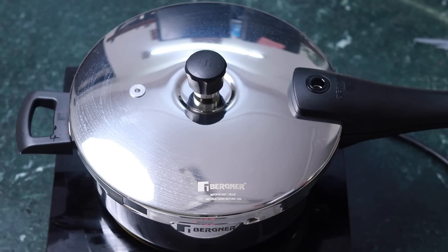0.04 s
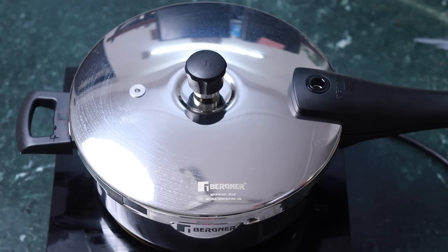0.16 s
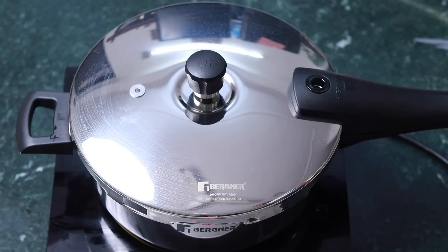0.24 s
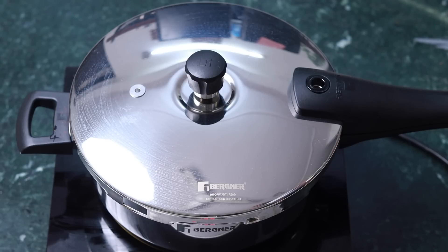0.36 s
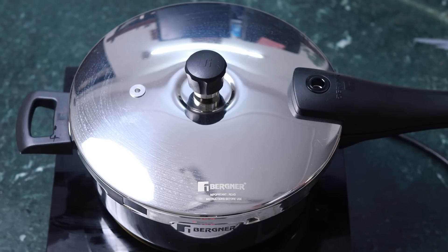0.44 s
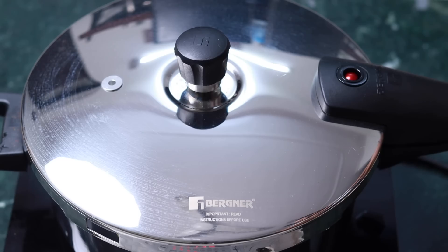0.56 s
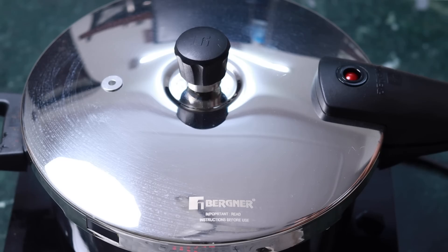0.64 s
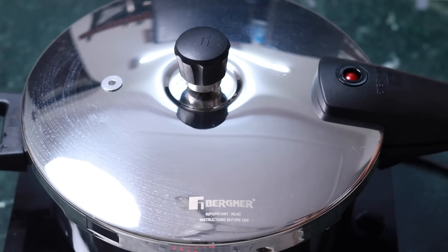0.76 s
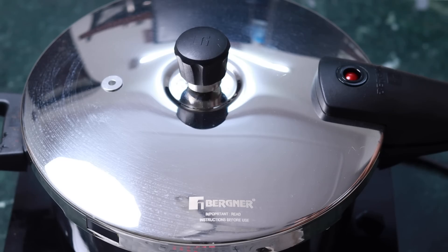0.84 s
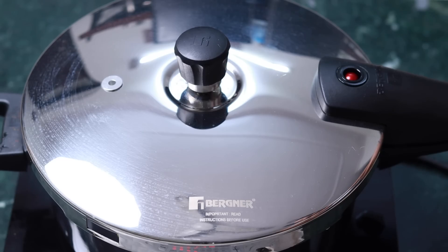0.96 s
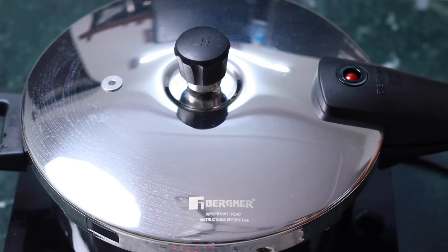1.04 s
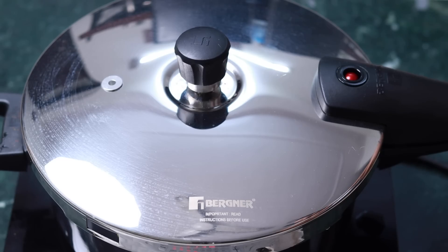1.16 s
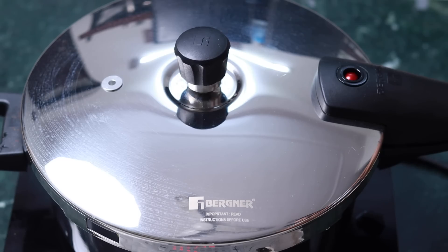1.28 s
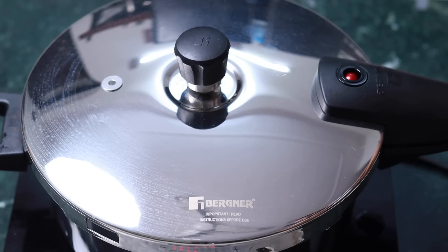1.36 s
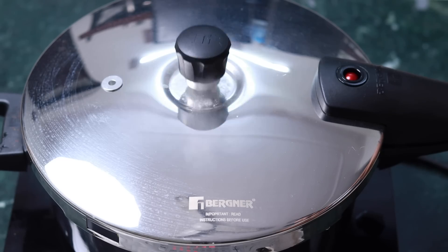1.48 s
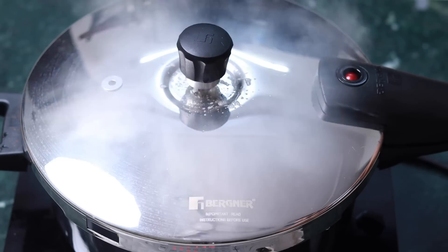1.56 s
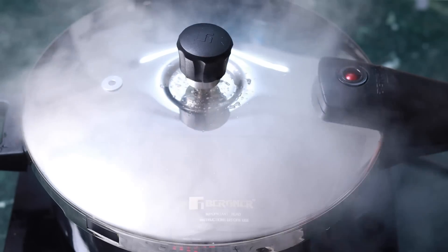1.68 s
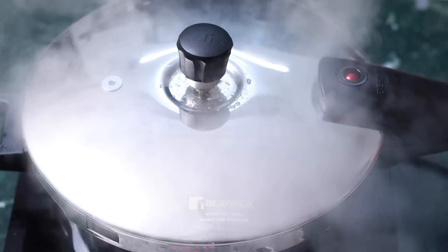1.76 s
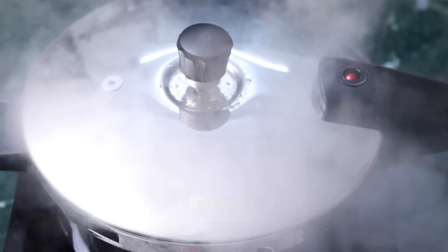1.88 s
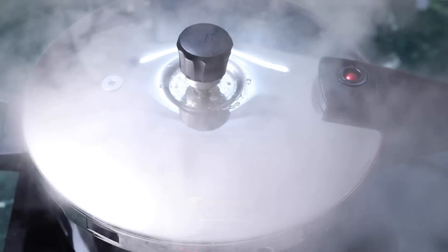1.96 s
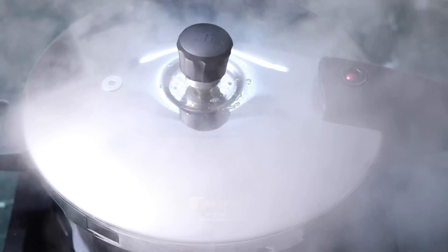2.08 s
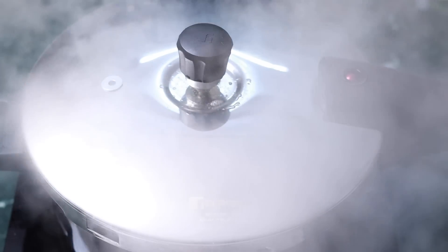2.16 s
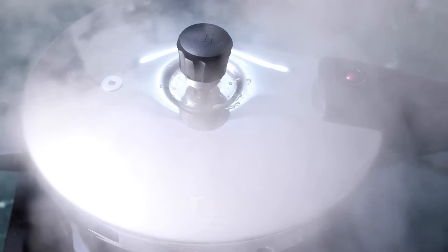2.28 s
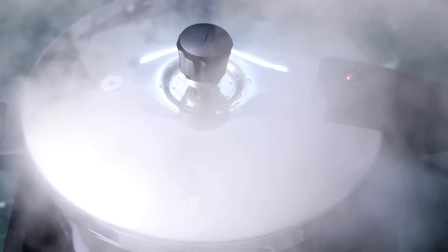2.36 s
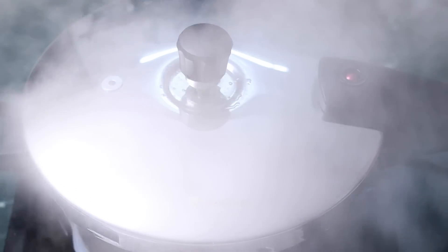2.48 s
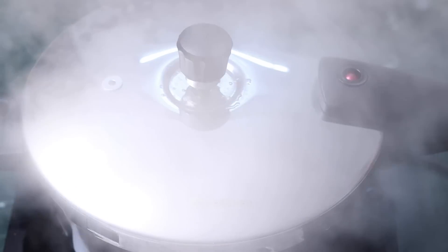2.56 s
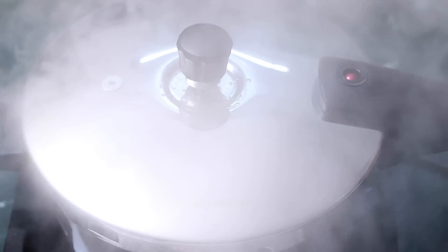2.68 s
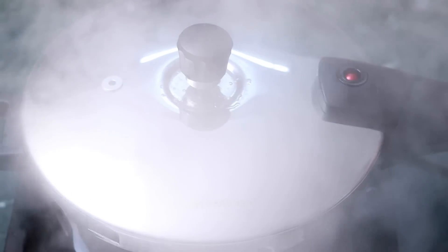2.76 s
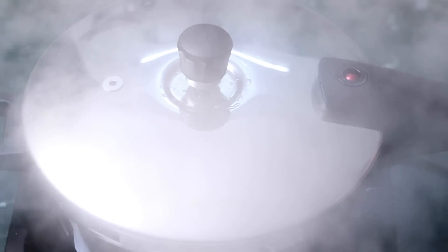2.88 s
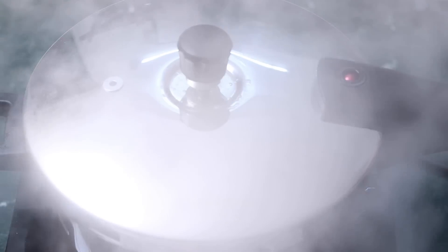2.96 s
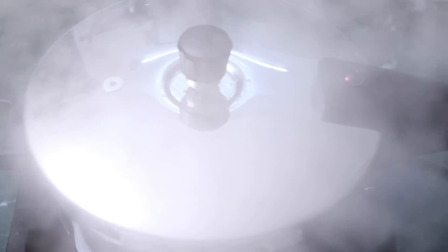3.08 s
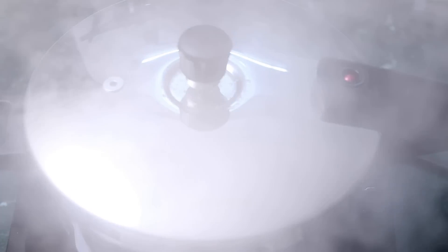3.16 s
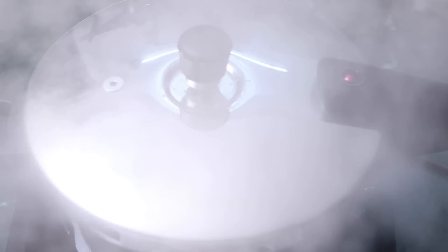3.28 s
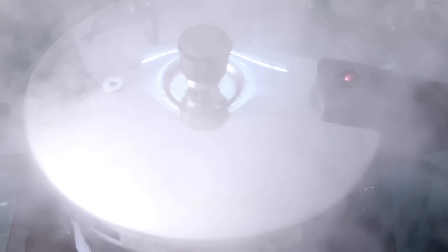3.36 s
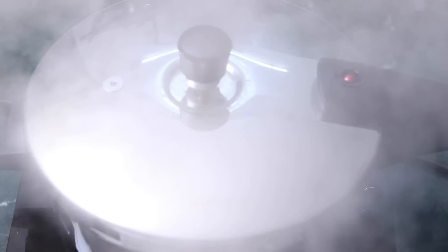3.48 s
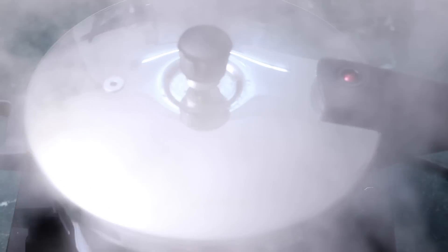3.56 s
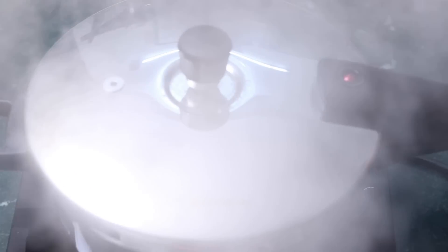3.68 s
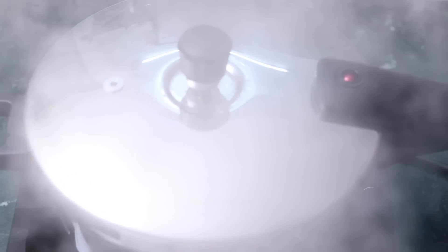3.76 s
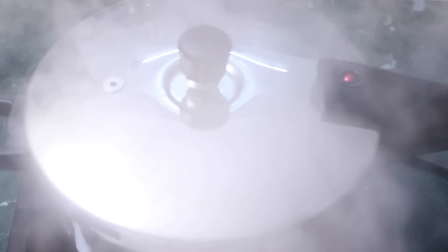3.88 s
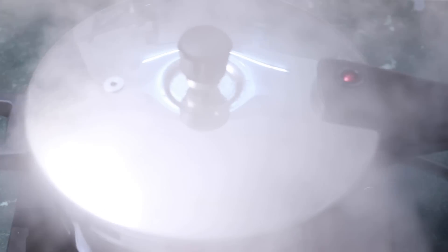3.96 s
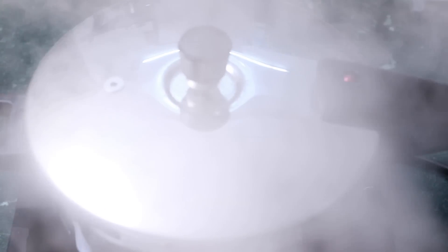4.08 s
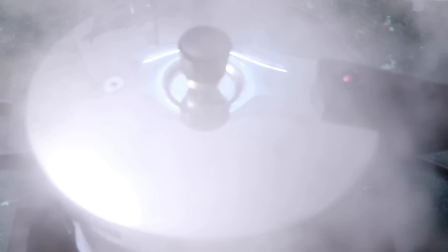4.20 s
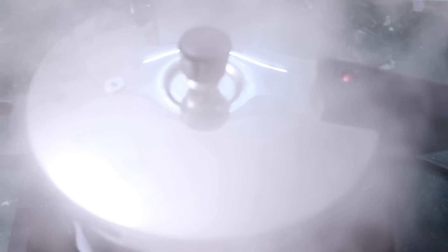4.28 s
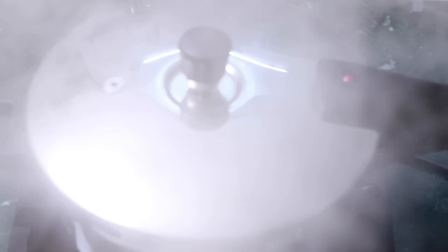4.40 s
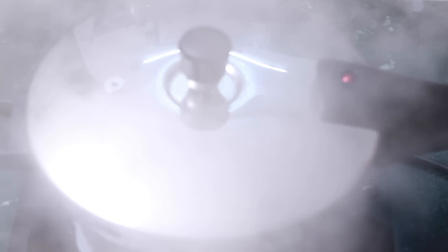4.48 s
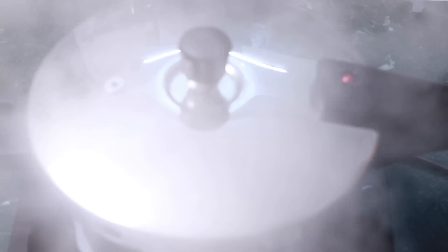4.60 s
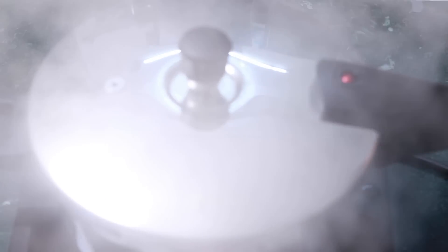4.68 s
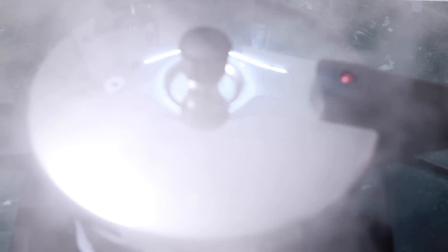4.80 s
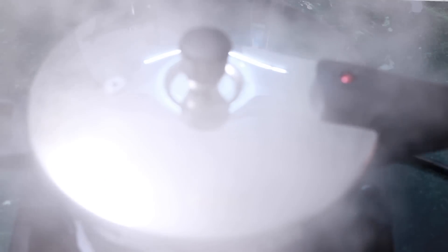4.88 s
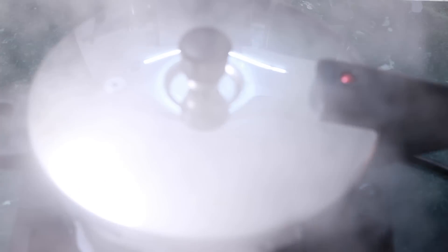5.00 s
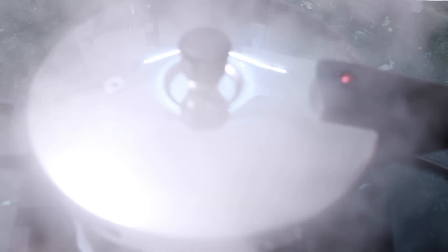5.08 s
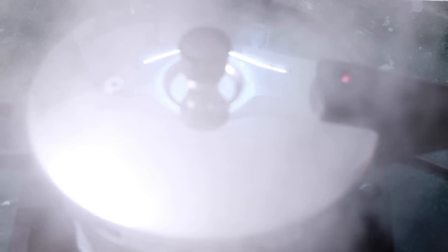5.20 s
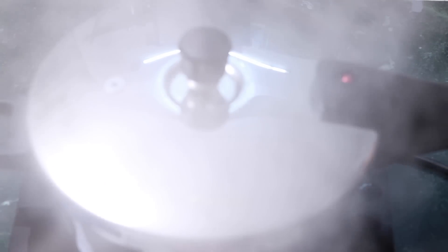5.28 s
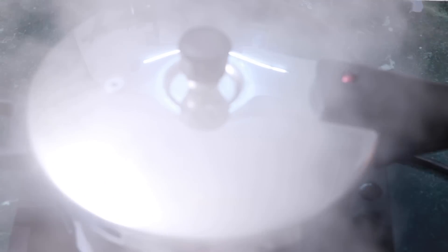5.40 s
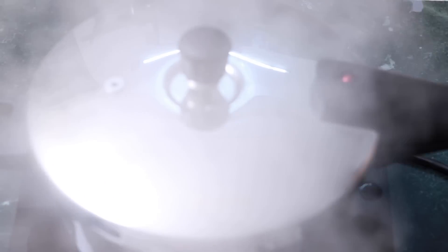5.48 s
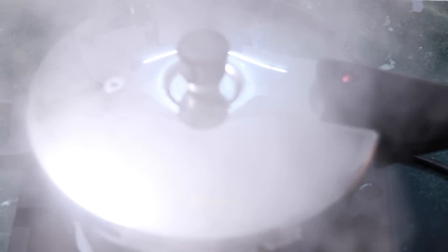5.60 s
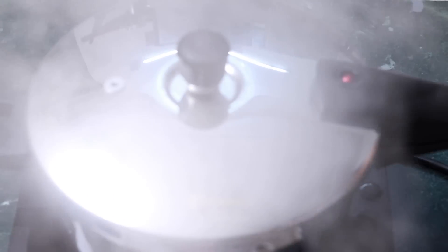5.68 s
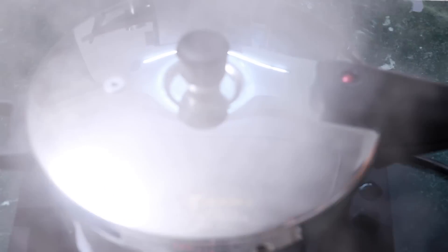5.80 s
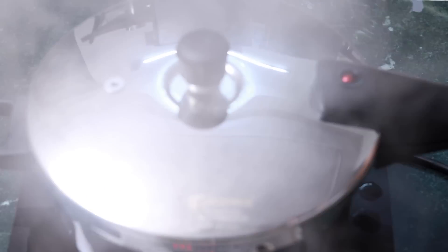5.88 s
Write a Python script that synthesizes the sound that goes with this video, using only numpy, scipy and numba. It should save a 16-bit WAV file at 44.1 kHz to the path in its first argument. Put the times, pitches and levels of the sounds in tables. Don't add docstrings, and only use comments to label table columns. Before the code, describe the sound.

Soft fan rush and simmering pot, crackly steam spits, a metallic knock, then a long bright steam jet that cuts off with a rattle.

```python
import sys
import numpy as np
from scipy import signal
from scipy.fft import rfft, irfft, next_fast_len
from scipy.io import wavfile
from scipy.ndimage import uniform_filter1d
from numba import njit

SR = 44100
rng = np.random.default_rng(int(sys.argv[2]) if len(sys.argv) > 2 else 0)


def volts_from_db(level):
    exponent = np.asarray(level, float) / 20
    return 10 ** exponent


def master(y):
    cut = np.clip(np.atleast_2d(y).T, -1, 1)
    pcm = np.round(cut * 32767)
    wavfile.write(sys.argv[1], SR, pcm.astype(np.int16))


N = 261938

# (frequency [Hz], level [dB per Hz])
FAN_COLOUR = [(70, -48), (120, -11.5), (420, -2), (700, -7), (1200, -9.5), (2080, -15), (4200, -24),
              (7850, -37), (11000, -49), (15600, -76)]
# (frequency [Hz], level [dB per Hz])
RUMBLE_COLOUR = [(25, -24), (45, -15), (70, -6), (100, -2), (130, -6.5), (200, -32.5)]
# (frequency [Hz], width [Hz], level [dB])
POT_MODES = [(426.5, 22, 0.5), (480, 69, -3.5), (551, 47, -7), (1035, 25, -22), (1208, 57, -11.5)]
# (full level [dB], change in the quiet opening [dB], change under the jet [dB], wander [dB])
FAN_LEVELS = (-52, -4.5, -4.5, 0)
HUM_LEVELS = (-42.5, -32, -6, 2.03)
RUMBLE_LEVELS = (-60, -10, -6, 0.5)
OPENING_RISE = .05, 0.53
# (time [s], half length [s], hum [dB], rumble and fan [dB])
JOLTS = [
    (1.59, .07, 8.5, -1),
    (3.87, 0.4, 2, 9.5),
    (5.664, 0.055, 9, 0),
]

# (time [s], peak [dB], upper bands relative [dB], rise [s])
PUFFS = [(0.38, -49, -12, 0.018), (0.476, -37.5, -11, .0021), (0.4994, -67, -13, .003),
         (0.6194, -55, 1.5, .003), (0.7144, -42.5, -7, 0.012), (0.871, -37, -6.5, .003),
         (0.9294, -43.5, 2.5, .003), (0.9537, -46, 0, 0.014), (1.103, -34.5, -8, 0.0065),
         (1.1244, -31, -3.5, 0.019), (1.14, -45, -6, .003), (1.1644, -39, -3, .003),
         (1.2776, -33, -8, .0025), (1.2944, -52, -12, .003)]
# (frequency [Hz], level [dB per Hz])
SPIT_LOW = [(2000, -16.5), (2650, -13), (2850, -1.5), (3500, -1.5), (3750, -13), (4600, -16), (5300, -29.5)]
SPIT_HIGH = [(4500, -24), (5400, -6), (6200, 2), (6600, 5), (7200, -7), (8100, 3), (8800, -8), (9600, -27)]
SPIT_TOP = [(8800, -6), (9800, -2), (11000, -5), (12500, -2), (13600, -7), (15600, -16)]

# (time [s], jet level [dB])
FLOW = [(0, -82), (.46, -65), (.475, -69), (1.245, -50), (1.36, -57.5), (1.474, -38), (1.514, -24.5),
        (1.586, -13.5), (1.64, -15.5), (2.09, -18.5), (3.06, -19.5), (3.2, -18.5), (3.87, -20), (5.59, -20),
        (5.634, -22.5), (5.659, -32), (5.864, -65), (5.94, -73)]
# (start [s], length [s])
MOVES = [
    (1.36, 0.22),
    (3.197, 0.34),
    (3.645, 0.053),
    (4.624, .08),
    (5.62, .05),
]
# (frequency [Hz], level [dB per Hz])
LEAKING = [(1180, -52), (2000, -44), (2320, -15), (2580, -32), (3010, 6), (3140, 5), (4050, -29),
           (4910, -9), (5360, -10), (6660, 2), (7350, -14), (8120, -9), (8800, -14), (11400, -60),
           (19400, -120)]
LIFTED = [(350, -38), (600, -18), (649, -23), (1020, -15), (1350, -14), (1950, -12), (2140, -15.5),
          (2830, -1.5), (3390, 3.5), (4050, -4.5), (4430, -1.5), (5870, -4), (7030, 1.5), (8800, -12.5),
          (11400, -40), (19400, -120)]
TURNING = [(350, -49), (600, -29), (743, -22), (940, -23.5), (1140, -21), (1250, -19), (1490, -28),
           (2160, -10), (2500, -15.5), (3660, -3), (4530, -8), (5020, -7.5), (7350, -5), (8800, -29),
           (11400, -51), (19400, -120)]
TILTED = [(350, -57), (600, -20.5), (984, -14), (1360, -21), (1780, -9), (2280, -7.5), (2560, -0.5),
          (2990, 1), (3700, 1.5), (5020, -4.5), (5430, 0.5), (6140, -3.5), (7520, 1.5), (8800, -15.5),
          (11400, -43), (19400, -120)]
SETTLING = [(350, -53), (600, -25), (656, -31), (710, -20), (760, -23.5), (984, -18.5), (1440, -25.5),
            (1830, -14), (2340, -14.5), (2610, -9), (3500, -1.5), (4100, -6), (7270, -6), (8800, -17.5),
            (11400, -43), (19400, -120)]
CLOSED = [(1000, -41), (1700, 1), (2150, 3), (2430, -3), (2680, 2), (3360, 0), (5710, -5), (6370, 6.5),
          (8800, -8), (11400, -43), (19400, -120)]
# (frequency [Hz], level [dB per Hz])
TOP_FAINT = [(5180, -28), (8800, -1), (9780, -4), (10700, -7), (11600, -7), (13800, -12), (15600, -17)]
TOP_EARLY = [(5180, -29), (8800, -3.5), (10200, -7.5), (11600, -8.5), (12500, 0.5), (13300, -1.5),
             (15200, -6.5), (15600, -7)]
TOP_LATE = [(5180, -40), (8800, -6.5), (9600, -5), (10500, -3.5), (11800, 0.5), (13900, 3), (15600, -2)]
# (top octave [dB], top colour [0 faint, 1 early, 2 late, 3 faint],
# lower edge tone [dB], upper edge tone [dB], upper pitch over lower [ratio])
SEATS = [
    (-8, 2.5, -35, -30, 1.8),
    (-9.5, 1.5, -26, -3, 2.06),
    (-9, 1.1, -7, -5, 1.92),
    (-8.5, 2, -3.5, -8, 2.03),
    (-8.5, 2, -6.5, -27, 2.03),
    (-2.5, 3.5, -24, -25, 2.03),
]
# (centre [Hz], depth [0-1])
SHADES = [
    (4050, .3),
    (3950, 0.23),
    (4500, 0.6),
    (5170, 0.36),
    (5250, 0.07),
    (5260, 0.4),
]
# (time [s], lower tone [Hz], strength over jet [dB])
EDGE_TONES = [(1.5, 3200, -9), (2.95, 3420, -7.5), (3.2, 3460, 0), (3.36, 3340, 0.5), (3.6, 3900, -3.5),
              (3.68, 3970, -9), (3.85, 3600, -8), (4.3, 3680, -7.5), (4.62, 3840, -10), (4.8, 3500, -4),
              (5.45, 3850, -13), (5.57, 4150, 0.5), (5.645, 3300, -1.5)]

# (time [s], peak [dB])
DROPS = [(.477, -44), (.499, -48), (.618, -48), (.873, -39), (.93, -44), (1.131, -37), (1.141, -31.5),
         (1.161, -32), (1.168, -34), (1.28, -35), (1.294, -34)]

# (time [s], peak [dB], core mode [Hz], ring stretch [ratio])
KNOCKS = [(1.527, -29, 480, 1.8), (1.569, -11, 730, 0.62), (1.589, -21.5, 800, 0.88), (5.6, -29, 748, 0.86),
          (5.633, -25.5, 730, 0.8), (5.654, -22, 816, 1.65), (5.695, -26, 812, 1.3), (5.72, -26, 780, 0.55),
          (5.741, -29.5, 806, 1.1), (5.765, -43, 776, 0.77), (5.8, -43, 793, 1.2)]
# (frequency [Hz], level [dB], time to fall 60 dB [s])
LID_MODES = [(324, -3.5, 0.029), (462, -10, 0.062), (626, -7.5, 0.037), (863, -7.5, 0.1),
             (1000, -5.5, 0.036), (1206, -6, 0.066), (1390, -7, 0.046), (1496, 1.5, 0.02)]

# (delay [ms], level [dB])
ECHOES = [(1.099, -40), (1.9, -42), (3.101, -27.5), (4.701, -20)]
# (time [s], centre [Hz])
SPLITS = [(1.878, 5650), (2.085, 15000), (2.179, 8600), (2.18, 12700), (2.552, 15000), (2.621, 8500),
          (2.645, 11000), (2.634, 13700), (3.131, 13700), (3.758, 8200), (3.759, 11000), (4.131, 7250),
          (4.427, 4700), (4.432, 6900), (4.863, 4850), (4.852, 13000), (4.941, 8250), (4.942, 10300),
          (5.197, 8900)]


def at(s, value):
    return np.interp(np.arange(N) / SR, s, value)


def ramp(start, length):
    return np.clip((np.arange(N) / SR - start) / max(length, .001), 0, 1)


def unit(x):
    return x / np.sqrt(np.mean(x ** 2))


def walk(rate):
    hold = int(SR / rate)
    steps = np.repeat(rng.standard_normal(N // hold + 1), hold)
    return unit(uniform_filter1d(uniform_filter1d(steps, hold), hold)[:N])


def colour(x, points):
    hz, db = np.transpose(points)
    size = next_fast_len(N, True)
    bins = np.arange(1, size // 2 + 2) * SR / size
    gain = volts_from_db(np.interp(np.log(bins), np.log(hz), db))
    return irfft(rfft(x, size) * gain, size)[:N]


def blend(noise, place, colours):
    return sum(np.clip(1 - abs(place - k), 0, 1) * unit(colour(noise, c)) for k, c in enumerate(colours))


@njit
def svf(x, hz, width):
    y, band, low = np.empty(len(x)), 0., 0.
    for i in range(len(x)):
        g, k = np.tan(np.pi * hz[i] / SR), width / hz[i]
        v = (band + g * (x[i] - low)) / (1 + g * (g + k))
        band, low, y[i] = 2 * v - band, low + 2 * g * v, k * v
    return y


def hob():
    quiet = 1 - ramp(OPENING_RISE[0], OPENING_RISE[1] - OPENING_RISE[0])
    duck = ramp(1.66, 0.11)
    fan_db, hum_db, rumble_db = (db + quiet_db * quiet + duck_db * duck + wander_db * walk(6.7)
                                 for db, quiet_db, duck_db, wander_db in (FAN_LEVELS, HUM_LEVELS, RUMBLE_LEVELS))
    for s, half, ring_db, thud_db in JOLTS:
        jolt = ramp(s - half, half) - ramp(s, half)
        fan_db = fan_db + 0.34 * thud_db * jolt
        hum_db = hum_db + ring_db * jolt
        rumble_db = rumble_db + thud_db * jolt
    blade_hz = 736 * (1 + 0.00155 * walk(5.12))
    blade = np.sin(2 * np.pi * np.cumsum(blade_hz) / SR) * volts_from_db(1 + 2 * walk(14))
    rush = volts_from_db(7.0) * unit(colour(rng.standard_normal(N), FAN_COLOUR))
    fan = (rush + blade) * volts_from_db(fan_db)
    rumble = unit(colour(rng.standard_normal(N), RUMBLE_COLOUR)) * volts_from_db(rumble_db)
    hum = 0
    for hz, width, db in POT_MODES:
        level = volts_from_db(db + 0.43 * walk(11))
        centre = hz * (1 + 0.0088 * walk(3.22))
        hum = hum + level * unit(svf(rng.standard_normal(N), centre, float(width)))
    hum = signal.lfilter(*signal.butter(2, 6000, fs=SR), hum)
    return fan + rumble + hum * volts_from_db(hum_db - 3)


def puffs():
    spray = rng.standard_normal(N) * volts_from_db(1.9 * walk(350))
    lower = unit(colour(rng.standard_normal(N) * volts_from_db(0.81 * walk(380)), SPIT_LOW))
    upper = unit(colour(spray, SPIT_HIGH)) + volts_from_db(-15) * unit(colour(spray, SPIT_TOP))
    out, clock = 0, np.arange(N) / SR
    for s, db, upper_db, rise in PUFFS:
        t = np.clip(clock - s, 0, 1)
        t60 = 0.09 + 2.2 * rise
        shape = ramp(s, rise) * volts_from_db(-60 * (t / t60) ** 2)
        out = out + volts_from_db(db - 9.0) * shape * (1.11 * lower + volts_from_db(upper_db) * upper)
    return out


def jet():
    seat = sum(ramp(*move) for move in MOVES)

    def by_seat(table):
        return [np.interp(seat, np.arange(len(table)), column) for column in np.transpose(table)]

    top_db, top_place, low_db, high_db, high_ratio = by_seat(SEATS)
    flutter = volts_from_db(0.48 * walk(300) + .5 * walk(40) + 0.065 * walk(8.9))
    seat_colours = (LEAKING, LIFTED, TURNING, TILTED, SETTLING, CLOSED)
    gap = blend(rng.standard_normal(N) * flutter, seat, seat_colours)
    top_colours = (TOP_FAINT, TOP_EARLY, TOP_LATE, TOP_FAINT)
    top = blend(rng.standard_normal(N) * flutter, top_place, top_colours)
    opening_db = -22 * (1 - ramp(.47, .004))
    sputter_db = 3.5 * np.clip(1 - seat, 0, 1) * (walk(80) - 3.5)
    steam = gap + top * volts_from_db(top_db + 0.66 * walk(10) + opening_db + sputter_db)

    t, edge_hz, edge_db = np.transpose(EDGE_TONES)
    for ratio, db, width in ((1, low_db, 600.), (high_ratio, high_db, 800.)):
        centre = ratio * at(t, edge_hz) * (1 + .012 * walk(12))
        tone = unit(svf(svf(rng.standard_normal(N), centre, width), centre, width))
        steam = steam + tone * volts_from_db(db + at(t, edge_db) + 2.0 * walk(15))

    shade_hz, depth = by_seat(SHADES)
    steam = steam - np.clip(depth, 0, 1) * svf(steam, shade_hz, 370.0)
    return steam * volts_from_db(at(*np.transpose(FLOW)))


def drops():
    clock, t60 = np.arange(N) / SR, .005
    hz, width = np.full(N, 7200.), 2700.
    burst = sum(volts_from_db(db - 60 * np.clip(clock - s, 0, 1) / t60) * (clock >= s) for s, db in DROPS)
    ticks = burst * np.sign(rng.standard_normal(N))
    return volts_from_db(9) * svf(svf(ticks, hz, width), hz, width)


def knocks():
    out, t = np.zeros(N + SR), np.arange(SR // 4) / SR
    core_t60 = 0.1
    phases = rng.random((len(KNOCKS), len(LID_MODES)))
    for (s, db, core_hz, stretch), turns in zip(KNOCKS, phases):
        ring = volts_from_db(-60 * t / (core_t60 * stretch)) * np.sin(2 * np.pi * core_hz * t)
        for (hz, mode_db, t60), turn in zip(LID_MODES, turns):
            fade = volts_from_db(mode_db - 60 * t / (t60 * stretch))
            ring += fade * np.sin(2 * np.pi * (hz * t + 0.49 * turn))
        contact_s = .0022 - .00007 * (db + 10)
        i = int(s * SR)
        out[i:i + len(t)] += volts_from_db(db - 3) * ring * np.minimum(t / contact_s, 1)
    return signal.sosfilt(signal.butter(2, 220, "high", fs=SR, output="sos"), out[:N])


def room(x):
    n, near = np.arange(N), x
    for ms, db in ECHOES:
        delay = (ms + 0.028 * walk(2.14)) * SR / 1000
        near = near + volts_from_db(db) * np.interp(n - delay, n, x)
    t, t60 = np.arange(SR // 2) / SR, 0.37
    tail = rng.standard_normal(len(t)) * volts_from_db(-60 * t / t60) * (t > .005)
    tail = signal.lfilter(*signal.butter(1, 5000, fs=SR), tail)
    tail = tail / np.sqrt(np.sum(tail ** 2))
    return near + volts_from_db(-12.5) * signal.fftconvolve(x, tail)[:N]


def scene():
    cooker = volts_from_db(-1.53) * jet() + puffs() + knocks() + drops()
    heard = room(cooker) + hob()
    return np.array([heard, heard])


def splits(x):
    side, block = np.zeros(N), 2048
    hz = np.arange(block // 2 + 1) * SR / block
    for s, centre_hz in SPLITS:
        i = int(s * SR) - block // 2
        earlier = rfft(x[i - 2 * block:i - block])
        patch = irfft(earlier * (abs(hz - centre_hz) < 770))
        side[i:i + block] += volts_from_db(-3.0) * patch * np.sin(np.pi * np.arange(block) / block)
    return side


def top_cut(x):
    return signal.sosfilt(signal.butter(12, 15800, fs=SR, output="sos"), x)


def record(dry):
    dry = signal.sosfilt(signal.ellip(10, .2, 80, 15750, fs=SR, output="sos"), dry)
    side = splits(dry[0])
    return top_cut(dry + np.array([side, -side]))


dry = scene()
out = record(dry)
master(out)
```